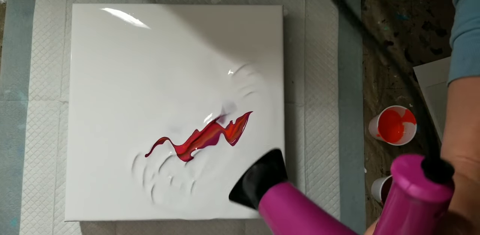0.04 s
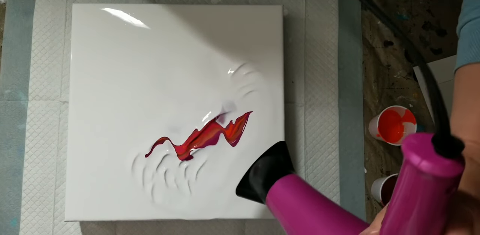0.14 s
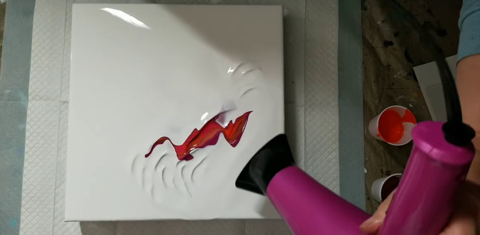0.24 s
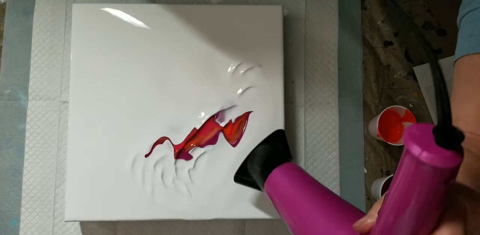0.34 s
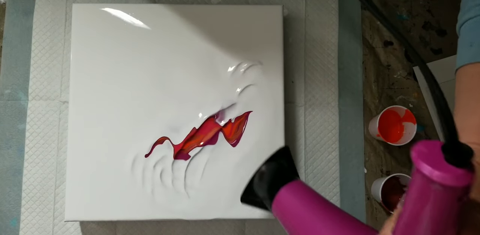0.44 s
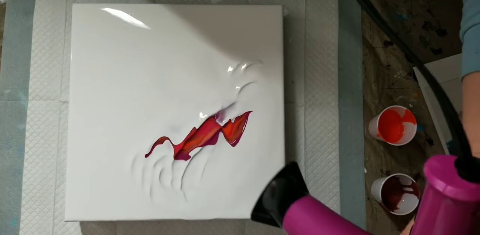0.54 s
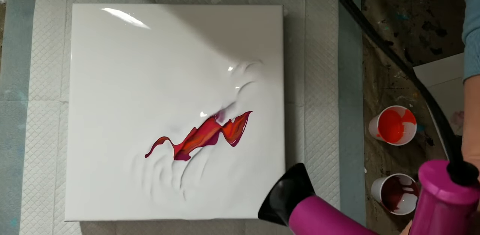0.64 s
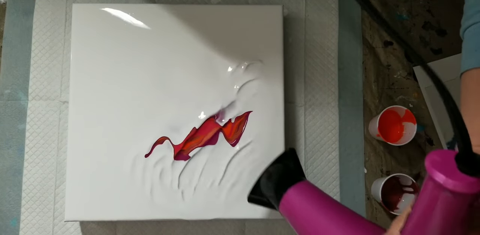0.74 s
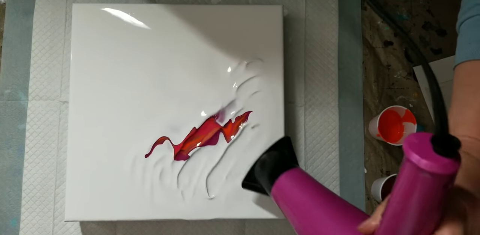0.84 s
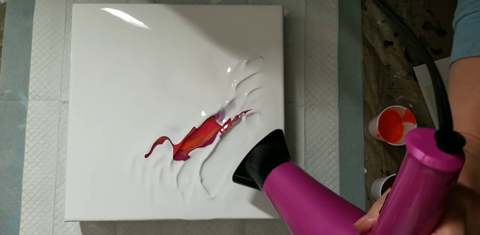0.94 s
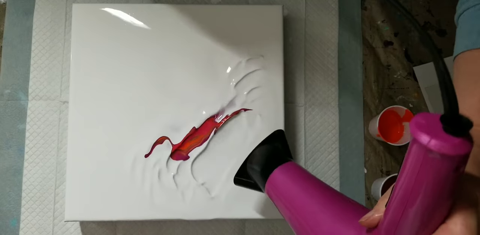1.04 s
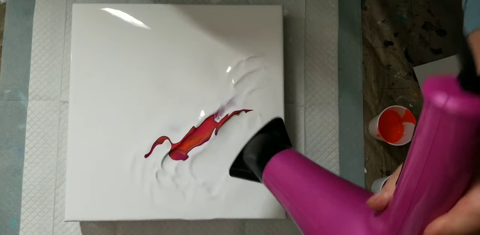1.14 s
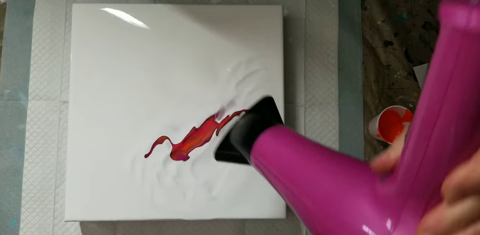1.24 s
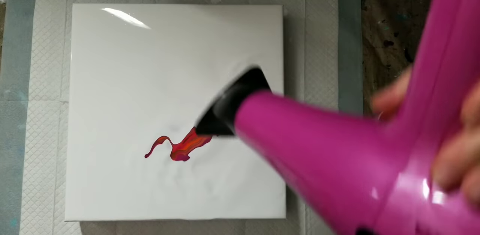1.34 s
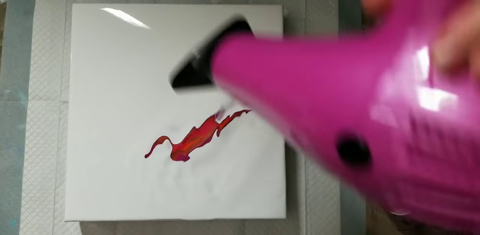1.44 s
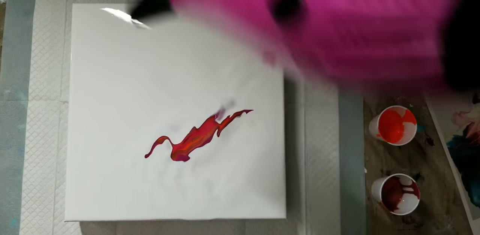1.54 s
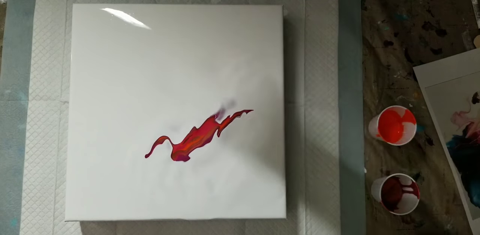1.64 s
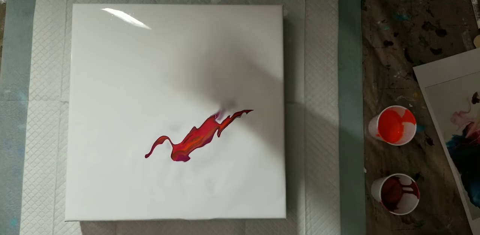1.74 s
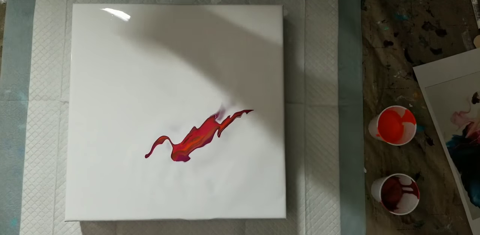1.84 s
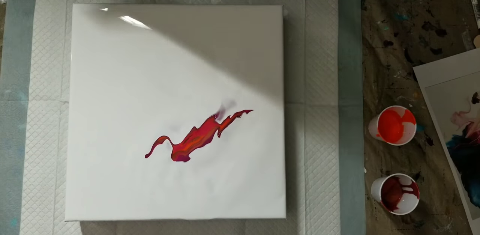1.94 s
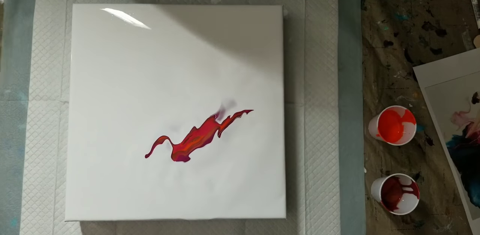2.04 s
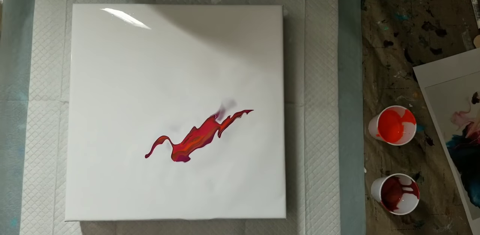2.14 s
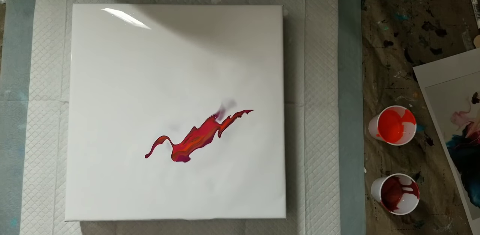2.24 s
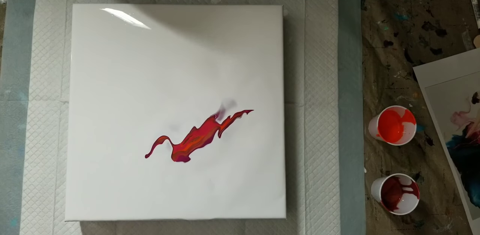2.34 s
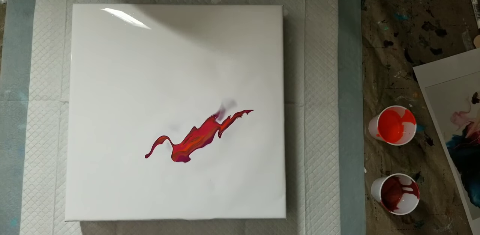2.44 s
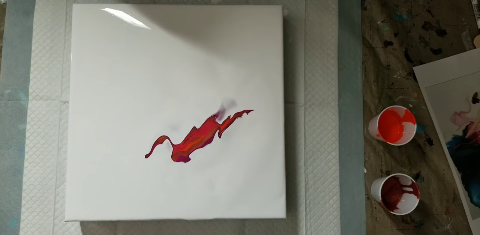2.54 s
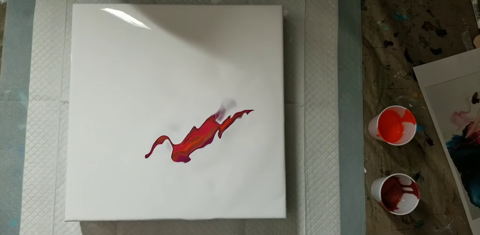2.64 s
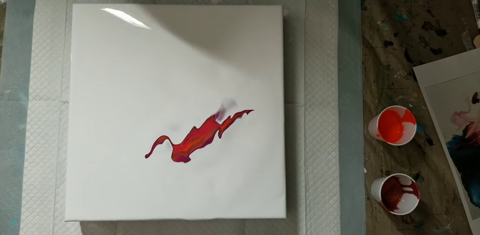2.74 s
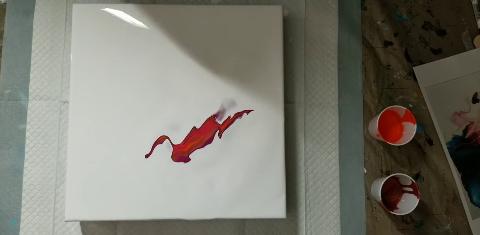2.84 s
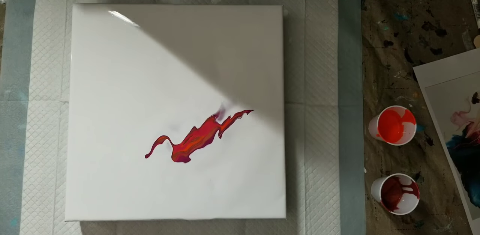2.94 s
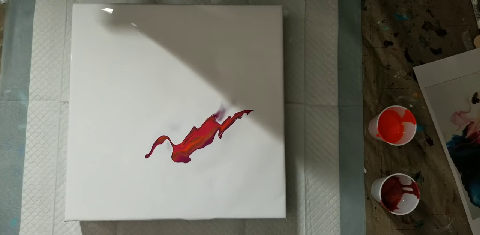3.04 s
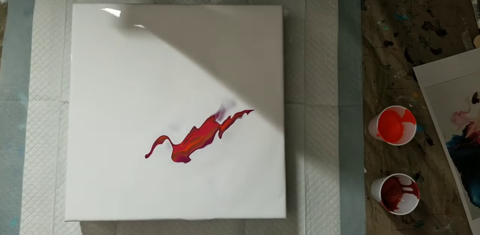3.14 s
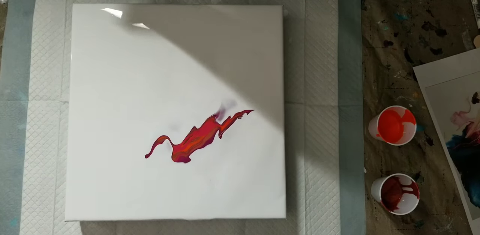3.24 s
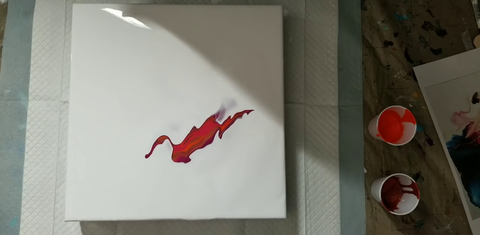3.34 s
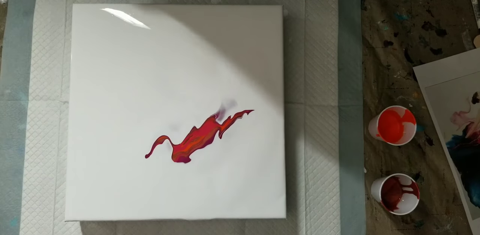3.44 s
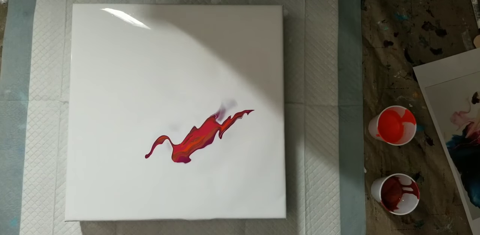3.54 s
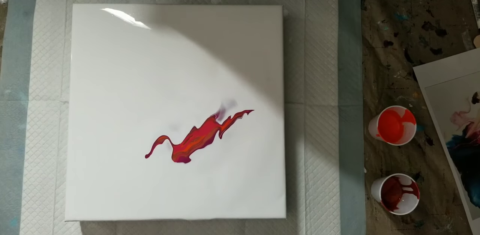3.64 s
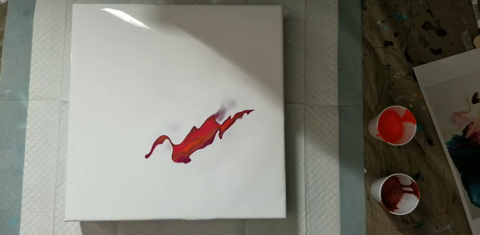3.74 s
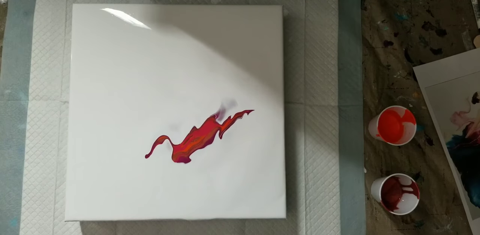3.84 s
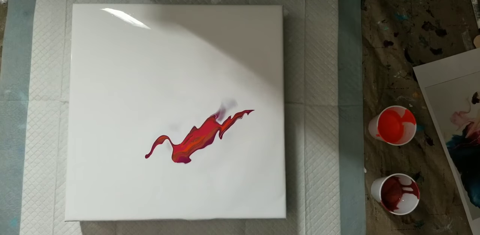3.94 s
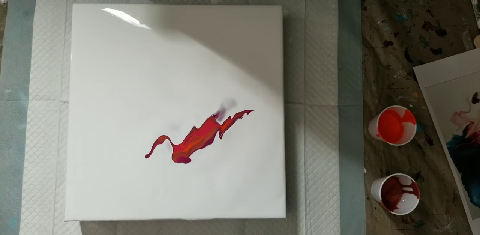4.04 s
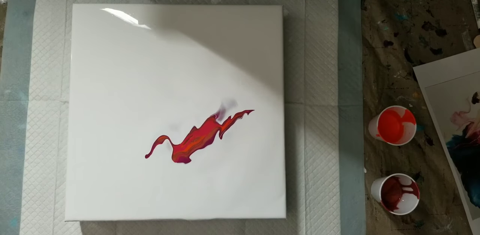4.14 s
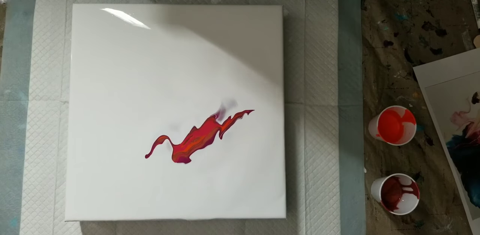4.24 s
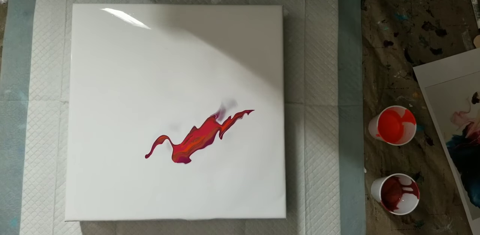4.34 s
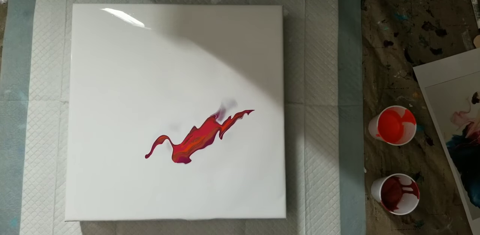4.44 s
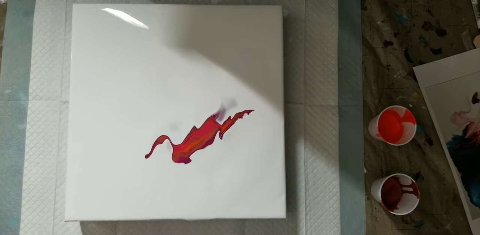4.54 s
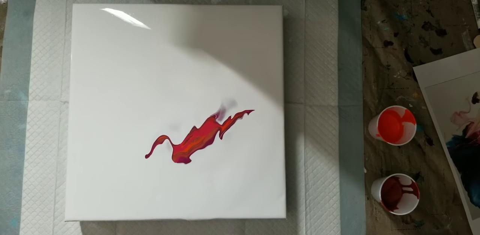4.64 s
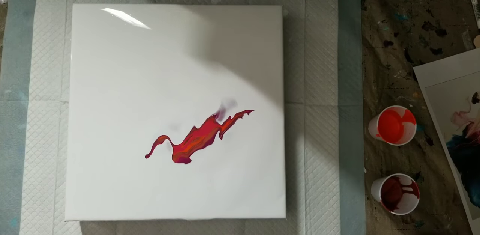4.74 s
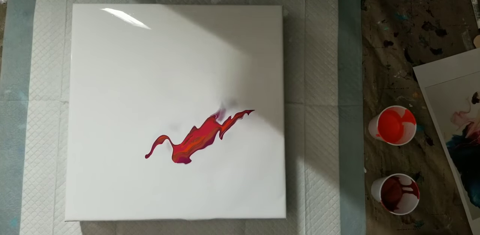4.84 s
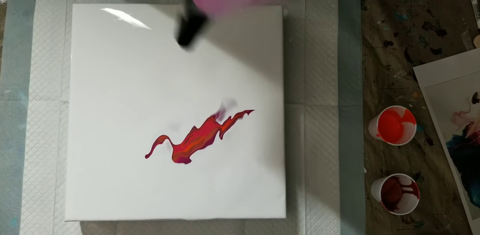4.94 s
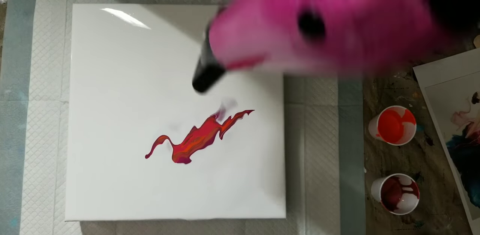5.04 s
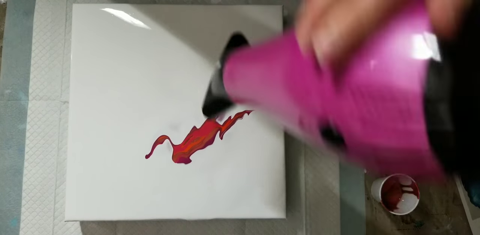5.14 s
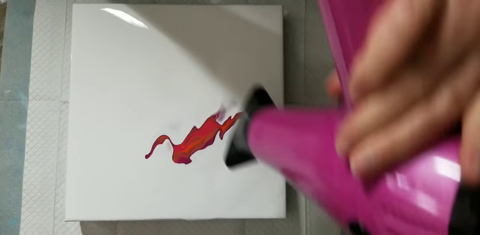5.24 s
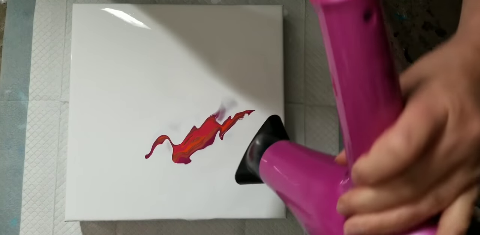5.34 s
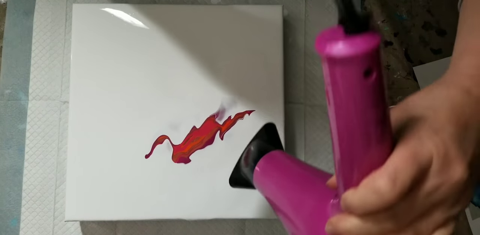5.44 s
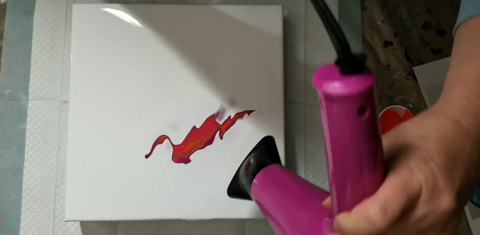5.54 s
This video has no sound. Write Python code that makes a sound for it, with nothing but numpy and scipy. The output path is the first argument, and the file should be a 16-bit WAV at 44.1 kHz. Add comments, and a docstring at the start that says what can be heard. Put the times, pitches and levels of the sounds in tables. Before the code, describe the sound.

A handheld hair dryer runs on high throughout, its broad airy roar and hiss topped by a fan whine near 2 kHz. It blows on a wet canvas, surges past the overhead stereo microphones, dips when held aside with the whine wavering, then builds and returns to the canvas. Small room, close pickup.

```python
"""Hair dryer over a canvas

A hair dryer on high blows at a canvas, swings up past overhead microphones, is held aside and comes back.
Shaped noise makes the roaring stream, the housing, the grille's hiss and the rush on the canvas.
Resonances ring on top in the housing, air intake and nozzle; a seven-blade fan whines in harmonics of its shaft.
Stray gusts buffet the microphones while the dryer is lifted; a small room and a table throw the air noise back."""
import sys
import numpy as np
from scipy import signal
from scipy.fft import rfft, irfft, next_fast_len
from scipy.io import wavfile
from scipy.ndimage import uniform_filter1d, map_coordinates

SR = 44100
rng = np.random.default_rng(int(sys.argv[2]) if len(sys.argv) > 2 else 0)


def transcribe(signal):
    """Save signal, clipped to [-1, 1], as a 16-bit WAV file at the path in sys.argv[1]."""
    frames = np.atleast_2d(signal).T
    limited = np.clip(frames, -1, 1)
    pcm = np.round(limited * 32767).astype(np.int16)
    wavfile.write(sys.argv[1], SR, pcm)


N = 247401  # length in samples

# where the dryer is: [t/s, lead of the left microphone/ms, left-right/dB, delay of the table's echo/ms]
DRYER_PATH = [(0, -0.11, 0.5, 1.44), (1.15, -0.14, 1, 1.26), (1.42, -0.14, -2.5, 2.33),
              (1.7, 0.16, 4, 3.38), (2.2, 0.27, 3, 2.72), (4.0, 0.16, 2.5, 3.1), (4.7, 0.12, 2.5, 3.07),
              (5.0, -0.027, 1, 3.56), (5.3, -0.16, -0.5, 2), (5.6, -.11, 1, 1.66)]
# how squarely the jet meets the canvas: [t/s, aim/0-1]
CANVAS_AIM = [(0, 0.93), (.5, 0.99), (1.1, 0.76), (1.35, 0.8), (1.6, 0), (1.9, 0.08), (5.1, 0.06),
              (5.35, 0.4), (5.61, 0.3)]
# loudness as the dryer nears and leaves the microphones: [t/s, level/dB]
NEARNESS = [(0, -23.5), (.35, -23), (.6, -23.5), (.9, -22.5), (1.2, -23), (1.38, -22), (1.52, -18.5),
            (1.66, -19.5), (1.85, -24.5), (2.05, -26.5), (2.45, -27), (2.9, -26.5), (3.25, -24),
            (3.75, -24), (4.3, -23), (4.75, -22.5), (4.95, -21), (5.3, -22), (5.61, -24.5)]
WORKING_DB = -22  # its value at working distance

# noise colour of the air stream: [f/Hz, relative level/dB]
STREAM_COLOUR = [(100, -60), (170, -20), (247, -10), (405, -10), (465, -2.5), (502, -3.5), (534, -3.5),
                 (646, -0.5), (755, 0.5), (988, -0.5), (1110, 2), (1260, -9.5), (1350, -3.5), (1760, -82),
                 (2970, -120)]
# noise colour of the housing: [f/Hz, relative level/dB]
HOUSING_COLOUR = [(740, -50), (1250, -3), (1330, -10), (1400, 3), (1470, -1.5), (1560, 1), (1770, 1),
                  (1940, 3), (1960, 2.5), (2100, -1), (2220, -2), (2330, 1), (2560, 0.5), (3100, -15.5),
                  (4030, -72), (6820, -120)]
# noise colour of the grille's hiss: [f/Hz, relative level/dB]
GRILLE_COLOUR = [(1650, -60), (2800, -3.5), (3120, -3.5), (3760, -1), (3920, 0), (4180, -5), (4300, -0.5),
                 (4560, -3.5), (4960, -7), (6330, -4), (6700, -4.5), (8000, -8.5), (8900, -17),
                 (11700, -14.5), (19800, -120)]
# noise colour of the topmost hiss: [f/Hz, relative level/dB]
SIZZLE_COLOUR = [(6000, -37), (8600, -10), (10500, -3.5), (12900, 7), (14400, 3)]
# noise colour of the jet splashing on the canvas: [f/Hz, relative level/dB]
CANVAS_COLOUR = [(110, -58), (160, -20.5), (210, -13.5), (250, -13.5), (310, -7.5), (400, -13.5),
                 (500, -1.5), (680, -3), (850, 2), (1060, -2.5), (1350, 4.5), (1800, -5), (2200, -7),
                 (3300, -33), (3850, -7.5), (4400, -10), (9000, -22)]
# noise colour of the gusts: [f/Hz, relative level/dB]
GUST_COLOUR = [(15, -34), (30, -21), (50, -10), (80, -3), (130, 2), (200, -5), (400, -21), (900, -60)]
# share of the power that arrives straight from the dryer: [f/Hz, share/0-1]
DIRECT_SHARE = [(200, 0.6), (700, 0.68), (1600, 0.76), (2800, 0.54), (4200, 0.55), (6500, 0.07),
                (13000, 0.56)]
# tilt between the microphones, the left hearing more treble: [f/Hz, left-right/dB]
PORT_TILT = [(150, -2.5), (500, 0), (1500, -1), (4000, 0), (8000, 1), (12500, 3.5)]

# the grille's slots face the microphones: [t/s, length/s, level/dB]
WHISTLE_FLARES = [(0, .58, -41), (.96, .2, -41), (1.599, 0.24, -38.5)]
# narrow modes of the housing: [f/Hz, width/Hz, relative level/dB]
HOUSING_MODES = [(534.5, 40, -8), (674.6, 50, -5.5), (1003, 41, -2.5), (1134, 30, -6), (1530, 45, -0.5),
                 (1630, 39, 0), (1706, 39, -1), (1914, 50, -3), (2370, 55, -13)]
# resonances of the air intake: [f/Hz, width/Hz, relative level/dB]
INTAKE_MODES = [(2416, 93, 2), (2623, 77, 2)]
# the intake faces the microphones: [t/s, length/s, level/dB]
INTAKE_FLARES = [(1.09, 0.17, -34), (1.38, 0.46, -30.5), (2.14, .12, -39), (2.87, 0.087, -43),
                 (4.54, 0.62, -30)]
# resonances that slide as the nozzle swings: [t/s, length/s, first f/Hz, last f/Hz, level/dB]
SWISHES = [(1.162, 0.36, 2110, 1950, -30.5), (1.38, 0.243, 1810, 1725, -27.5),
           (1.56, 0.33, 1640, 1452, -40), (4.953, 0.45, 1497, 1703, -32.5), (5.22, 0.27, 1785, 2045, -35)]

# speed of the fan: [t/s, shaft turns a second/Hz]
SHAFT_SPEED = [(0, 289.7), (.9, 290.2), (1.4, 290.3), (1.75, 289.5), (2.7, 289.9), (3.2, 289.9),
               (3.8, 289.5), (4.9, 289.9), (5.61, 289.4)]
# weaker shaft tones: [multiple of the shaft rate, relative level/dB]
SHAFT_TONES = [(1, -32), (3, -19.5), (4, -19.5), (6, -15.5)]
# the blade tone swells as the dryer crosses a standing wave of the room: [t/s, length/s, level/dB, left-right/dB]
WHINE_SWELLS = [(1.187, 0.24, -30, -5), (1.38, 0.36, -29, 4), (1.74, 0.3, -36, 7), (1.97, 0.1, -28, -10),
                (2.092, 0.2, -32.5, 22), (2.29, 0.53, -36, 18), (2.957, 0.14, -28, 13),
                (3.06, 0.47, -29.5, -23), (3.75, 0.35, -38.5, 8), (4.098, 0.44, -31, 14),
                (4.54, 0.32, -34.5, 3), (4.901, 0.18, -27.5, 5), (5.077, 0.15, -32, -3),
                (5.33, 0.38, -31.5, -5)]
# the blade tone's octave, which beams and fades as the dryer turns: [t/s, level/dB]
OCTAVE_LEVEL = [(0, -40), (.42, -35.5), (.7, -39.5), (1.03, -36.5), (1.6, -40.5), (2.1, -47), (2.4, -41),
                (3.4, -41), (4.1, -41.5), (5.0, -38.5), (5.2, -40), (5.38, -32), (5.6, -47)]
# the blade tone's third harmonic beams past the microphones: [t/s, length/s, level/dB]
THIRD_BEAMS = [(.65, .5, -46), (3.0, 0.72, -50), (4.303, .42, -39), (4.9, 0.28, -46)]
# the nozzle's drifting resonance: [t/s, f/Hz]
NOZZLE_PITCH = [(0, 1408), (1.3, 1410), (1.7, 1463), (2.2, 1418), (3.2, 1466), (4.9, 1456), (5.1, 1418),
                (5.61, 1412)]
# its hollow note blooms as the nozzle turns towards the microphones: [t/s, length/s, level/dB]
HOOT_BLOOMS = [(1.214, 0.23, -30), (1.498, 0.41, -33.5), (2.16, 0.12, -34), (3.1, 0.55, -40),
               (3.85, 1.4, -32.5), (4.917, 0.41, -25.5), (5.45, .2, -35)]
# puffs of air on the microphones: [t/s, length/s, level before the left-right trim/dB]
GUST_PUFFS = [(1.364, 0.1, -46.5), (1.47, 0.12, -44.5), (1.59, 0.16, -46), (1.77, 0.17, -52),
              (2.21, 0.18, -56), (2.399, 0.13, -56), (2.54, 0.069, -59), (2.665, 0.093, -57),
              (2.785, 0.1, -51), (3.043, 0.087, -51), (3.293, 0.051, -55), (3.504, 0.047, -53),
              (3.593, 0.079, -51), (3.81, 0.057, -50), (3.913, 0.05, -56), (4.032, 0.29, -54),
              (4.367, 0.12, -57), (4.522, 0.22, -54), (4.726, 0.17, -49.5), (4.92, 0.27, -50.5),
              (5.17, 0.19, -48), (5.541, 0.033, -53)]

BLADES = 7
SHAFT_JITTER_HZ = 0.35  # unsteadiness of the shaft
MODE_FADE_DB = 4  # how far the ringing modes come and go
SWELL_EDGE_S = 0.11
PORT_SPACING_MS = 0.36  # sound's travel time between the microphones
TOP_HZ = 14600


def airflow():
    """All the broad air noise: the moving parts are panned with the dryer, the rush on the canvas stays put."""
    pan_db = curves(DRYER_PATH)[1]
    return (stream() + housing() + grille() + sizzle() + whistle()) * panned(pan_db) + canvas()


def stream_level():
    """Level in dB of the jet, shared by the free stream and the rush on the canvas."""
    return heard_db(db=-27.5, growth=0.93, aimed_db=1.66)


def stream():
    """The part of the jet that misses the canvas roars as turbulent noise."""
    level_db = stream_level()
    free = np.sqrt(1 - aim_curve() ** 2)
    roar = amp(level_db) * free * turbulence(STREAM_COLOUR, *moving_path(), echo=0.35, room_db=0.5)
    # where the stream is softer it loses body below about 560 Hz
    closeness = amp(0.16 * (level_db - level_db.max()))
    body = filtered(roar, lambda hz: 1 / (1 + (hz / 560) ** 8))
    return roar + 0.96 * (closeness - 1) * body


def canvas(sway_db=0.0):
    """The jet splashes on the canvas as patchy noise from a fixed place, stronger the squarer the aim."""
    splash = turbulence(CANVAS_COLOUR, lead_ms=0.013, echo_ms=0.52, echo=0.052, room_db=-1.0)
    level_db = stream_level() + 4.0 + sway_db * wobble(5.4)
    return amp(level_db) * aim_curve() * eddies(splash, depth_db=1.6)


def housing():
    """Air noise coloured by the broad resonances of the housing."""
    level_db = heard_db(db=-23.5, growth=0.85, aimed_db=-6.0)
    return amp(level_db) * turbulence(HOUSING_COLOUR, *moving_path(), echo=0.032, room_db=0.5)


def grille():
    """Air hisses through the grille, with eddies shifting its spectrum."""
    level_db = heard_db(db=-25.5, growth=0.94, aimed_db=-1.0)
    hiss = turbulence(GRILLE_COLOUR, *moving_path(), echo=0.27, room_db=5.5)
    return amp(level_db) * eddies(hiss, depth_db=0.8)


def sizzle(flutter_db=0.6):
    """The topmost hiss arrives from all walls and flutters lightly."""
    level_db = heard_db(db=-31.5, growth=0.76, aimed_db=-2.5) + flutter_db * wobble(25)
    return amp(level_db) * unit(room_noise(lambda hz: amp(along(SIZZLE_COLOUR, hz))))


def whistle():
    """Two breathy resonances of the grille; the lower one flares when its slots face the microphones."""
    lead_ms, pan_db, _ = curves(DRYER_PATH)
    low_gain = np.hypot(amp(heard_db(db=-45.0, growth=0.41, aimed_db=-3)), swells(WHISTLE_FLARES))
    high_gain = amp(heard_db(db=-43.5, growth=0.8, aimed_db=-15))
    low = low_gain * resonance(hz=3830, width_hz=54, lead_ms=lead_ms)
    high = high_gain * resonance(hz=6410, width_hz=110, lead_ms=lead_ms)
    # panned here and again with the rest of the airflow, so it leans further to its side
    return panned(pan_db) * (low + high)


def housing_modes(stray_hz=12):
    """Air noise rings in narrow modes of the housing; each comes and goes, and strays, as the dryer turns."""
    lead_ms, pan_db, _ = curves(DRYER_PATH)
    arrival = np.arange(N) / SR + np.array([lead_ms, -lead_ms]) / 2 / 1000
    out = np.zeros((2, N))
    for hz, width_hz, db in HOUSING_MODES:
        ring = swirl(width_hz) * amp(MODE_FADE_DB * wobble(5))
        drift = np.cumsum(stray_hz * wobble(4)) / SR
        out += amp(db) * unit(np.real(ring * np.exp(2j * np.pi * (hz * arrival + drift))))
    return amp(heard_db(db=-36.0, growth=1.07, aimed_db=0.5)) * panned(pan_db) * out


def intake():
    """The air intake flutters in two close resonances, which stand out when it faces the microphones."""
    lead_ms, pan_db, _ = curves(DRYER_PATH)
    rings = np.zeros((2, N))
    for hz, width_hz, db in INTAKE_MODES:
        rings += amp(db + MODE_FADE_DB * wobble(9)) * resonance(hz, width_hz, lead_ms)
    gain = np.hypot(amp(heard_db(db=-38.5, growth=0.27, aimed_db=3.5)), swells(INTAKE_FLARES))
    return gain * panned(pan_db) * unit(rings)


def swish(rate=120):
    """As the nozzle swings up, a narrow resonance in its air noise slides down; on the return it rises."""
    out = np.zeros((2, N))
    for start, length, first_hz, last_hz, db in SWISHES:
        progress = np.clip((np.arange(N) / SR - start) / length, 0, 1)
        centre_hz = first_hz * (last_hz / first_hz) ** progress
        # one part is shared by both microphones, one belongs to each
        breath = np.array([swirl(rate) for _ in range(3)])
        carrier = np.exp(2j * np.pi * np.cumsum(centre_hz) / SR)
        band = np.real((breath[0] + 0.5 * breath[1:]) * carrier)
        out += amp(db) * np.sin(np.pi * progress) * unit(band)
    return out


def fan():
    """One unsteady shaft drives the blade tone, its harmonics, weaker shaft tones and the nozzle's hollow note."""
    turns = np.cumsum(curves(SHAFT_SPEED)[0] + SHAFT_JITTER_HZ * wobble(14)) / SR
    lead_ms, pan_db, _ = curves(DRYER_PATH)
    # on the canvas the tones reach both microphones nearly together
    lead_ms = lead_ms * (1 - curves(CANVAS_AIM)[0])
    heard = turns + np.array([lead_ms, -lead_ms]) / 2 * SHAFT_SPEED[0][1] / 1000
    own_mix = blade_octave(heard) + blade_whine(heard, pan_db) + nozzle_hoot(heard, pan_db)
    return own_mix + panned(pan_db) * (shaft_tones(heard) + blade_third(heard))


def blade_whine(heard, pan_db):
    """Seven blades passing at each turn sound one tone, which swells in the room's standing waves."""
    steady_db = heard_db(db=-36.5, growth=1.0, aimed_db=3.0)
    return swelling(steady_db, WHINE_SWELLS, pan_db) * tone(heard, BLADES, scatter=0.2, rate=35)


def blade_octave(heard, fade_db=1.2):
    """The blade tone's octave, part of it smeared into a narrow noise band by turbulence at the blades."""
    clear = tone(heard, 2 * BLADES, scatter=0.41, rate=46)
    smeared = tone(heard, 2 * BLADES, scatter=1.7, rate=220)
    return amp(curves(OCTAVE_LEVEL)[0] + fade_db * wobble(9.0)) * (0.76 * clear + 0.72 * smeared)


def blade_third(heard):
    """The blade tone's third harmonic, faint except where it beams past the microphones."""
    return (amp(-49) + swells(THIRD_BEAMS)) * tone(heard, 3 * BLADES, scatter=0.4, rate=30)


def shaft_tones(heard, fade_db=0.5):
    """Weak multiples of the shaft rate that come and go."""
    tones = np.zeros((2, N))
    for order, db in SHAFT_TONES:
        tones += amp(db) * unit(amp(fade_db * wobble(3.17)) * tone(heard, order, scatter=1.14, rate=16))
    return amp(heard_db(db=-26.5, growth=0.53, aimed_db=3.5)) * tones


def nozzle_hoot(heard, pan_db, width_hz=40, side_db=5):
    """The nozzle rings with the air noise and with the fifth shaft tone, which lies in its resonance."""
    cycles = np.cumsum(curves(NOZZLE_PITCH)[0]) / SR
    ring = np.real(swirl(width_hz) * np.exp(2j * np.pi * cycles))
    note = 0.64 * unit(ring) + 0.64 * tone(heard, order=5, scatter=0.78, rate=30)
    blooms = [(*row, side_db) for row in HOOT_BLOOMS]
    return swelling(heard_db(db=-37.0, growth=0.53, aimed_db=1.0), blooms, pan_db) * note


def gusts(flutter_db=3.5, draught_db=-79, edge_share=0.5):
    """Stray puffs, each a rounded swell of low noise over a faint draught, beat harder on the right microphone."""
    shared = 1.1 * rng.standard_normal(N)
    puffs = filtered(shared + rng.standard_normal((2, N)), lambda hz: amp(along(GUST_COLOUR, hz)))
    strength = amp(draught_db) + sum(amp(db) * swell(s, length, edge_share * length)
                                     for s, length, db in GUST_PUFFS)
    return strength * amp(flutter_db * wobble(22)) * unit(puffs) * amp([[-3], [1.5]])


def turbulence(spectrum, lead_ms, echo_ms, echo, room_db):
    """Air noise from one place: the straight path, its echo off the table, and the room."""
    share = lambda hz: along(DIRECT_SHARE, hz)
    colour = lambda hz: amp(along(spectrum, hz))
    straight = filtered(rng.standard_normal(N), lambda hz: colour(hz) * np.sqrt(share(hz)))
    straight = straight + echo * delayed(straight, echo_ms)
    room = room_noise(lambda hz: colour(hz) * np.sqrt(1 - share(hz)))
    return unit(at_microphones(straight, lead_ms) + amp(room_db) * room)


def room_noise(colour, common=0.75):
    """Noise from all walls: most alike at both microphones in the bass, its shifting dips shallower in the treble."""
    hz, _, z = signal.stft(rng.standard_normal((2, N)), SR, nperseg=2048)
    field = uniform_filter1d(rng.standard_normal(z.shape), size=2, axis=1)
    field = uniform_filter1d(field, size=28, axis=2)
    depth_db = 4.5 / (1 + hz[:, None] / 4000)
    pair = unit(signal.istft(z * amp(depth_db * unit(field)))[1][:, :N])
    alike = lambda f: common * np.sinc(2 * f * PORT_SPACING_MS / 1000)
    mid_side = lambda f: np.sqrt(np.array([1 + alike(f), 1 - alike(f)]) / 2)
    mid, side = filtered(pair, lambda f: colour(f) * mid_side(f))
    return np.array([mid + side, mid - side])


def eddies(x, depth_db):
    """Eddies in the air lift and drop broad patches of the spectrum for a few hundredths of a second."""
    z = signal.stft(x, nperseg=512)[2]
    field = uniform_filter1d(rng.standard_normal(z.shape[1:]), size=6, axis=0)
    field = uniform_filter1d(field, size=9, axis=1)
    return unit(signal.istft(z * amp(depth_db * unit(field)))[1][:, :N])


def resonance(hz, width_hz, lead_ms):
    """Air noise ringing in one narrow resonance, at the two microphones."""
    ring = filtered(rng.standard_normal(N), lambda f: 1 / (1 + (2 * (f - hz) / width_hz) ** 2))
    return unit(at_microphones(ring, lead_ms))


def tone(heard, order, scatter, rate):
    """One harmonic of the shaft at rms 1, fading as scattered reflections shift."""
    walls = np.array([swirl(rate) for _ in range(2)])
    return unit(np.real((1 + scatter * walls) * np.exp(2j * np.pi * order * heard)))


def swelling(steady_db, rows, pan_db):
    """Left and right gain of a steady tone with swells added in power."""
    power = (amp(steady_db) * panned(pan_db)) ** 2
    for start, length, db, side_db in rows:
        power = power + (amp(db) * panned(side_db)[:, None] * swell(start, length, SWELL_EDGE_S)) ** 2
    return np.sqrt(power)


def swells(rows):
    """Summed gain of several swells."""
    return sum(amp(db) * swell(start, length, SWELL_EDGE_S) for start, length, db in rows)


def swell(start, length, edge):
    """Rise, hold and fall between 0 and 1; the rounded edges are centred on the start and the end."""
    t = np.arange(N) / SR - start
    return np.sin(np.pi / 2 * np.clip(0.5 + np.minimum(t, length - t) / edge, 0, 1)) ** 2


def heard_db(db, growth, aimed_db):
    """Level of one part: db at working distance, growing with nearness, changed by aiming at the canvas."""
    return db + growth * (curves(NEARNESS)[0] - WORKING_DB) + aimed_db * curves(CANVAS_AIM)[0]


def aim_curve():
    """How squarely the jet meets the canvas, 0 to 1."""
    return np.clip(curves(CANVAS_AIM)[0], 0, 1)


def moving_path():
    """Lead of the left microphone and delay of the table's echo, both in ms."""
    lead_ms, _, echo_ms = curves(DRYER_PATH)
    return lead_ms, echo_ms


def at_microphones(x, lead_ms):
    """The same sound at both microphones, reaching the left one earlier by the lead."""
    return np.array([delayed(x, -lead_ms / 2), delayed(x, lead_ms / 2)])


def delayed(x, ms):
    """x arriving later by a changing delay."""
    return map_coordinates(x, [np.arange(N) - ms * SR / 1000], mode="mirror")


def panned(db):
    """Left and right gains for a level difference, at constant power."""
    gains = amp(np.array([db, -db]) / 2)
    return gains / np.sqrt(np.mean(gains ** 2, axis=0))


def filtered(x, response):
    """x times a response of frequency."""
    m = next_fast_len(N + SR // 4)
    return irfft(rfft(x, m) * response(np.fft.rfftfreq(m, 1 / SR)), m)[..., :N]


def wobble(rate):
    """A smooth random curve, rate knots a second."""
    knots = np.arange(N) * rate / SR
    coarse = knots[::32]
    curve = map_coordinates(rng.standard_normal(int(knots[-1]) + 4), [coarse])
    return np.interp(knots, coarse, curve)


def swirl(rate):
    """A wobble of both strength and phase, as a complex curve."""
    return wobble(rate) + 1j * wobble(rate)


def curves(rows):
    """One value per sample for each column after the time."""
    s, *cols = np.transpose(rows)
    return [np.interp(np.arange(N) / SR, s, c) for c in cols]


def along(points, hz):
    """Interpolate (f/Hz, value) points on a log axis."""
    f, v = np.transpose(points)
    return np.interp(np.log(hz + 1), np.log(f + 1), v)


def amp(db):
    """Decibels to gain."""
    return 10 ** (np.asarray(db) / 20)


def unit(x):
    """Scale to rms 1."""
    return x / np.sqrt(np.mean(x ** 2) + 1e-20)


def scene(low_hz=130):
    """The dryer's air and fan at the two microphones; the broad air noise leaves the deep bass to the gusts."""
    air = filtered(airflow(), lambda hz: panned(along(PORT_TILT, hz)) / (1 + (low_hz / (hz + 1)) ** 6))
    return air + housing_modes() + intake() + swish() + fan() + gusts()


def record(dry):
    """The microphones' channel keeps nothing above its band limit."""
    return filtered(dry, lambda hz: hz < TOP_HZ)


dry = scene()
out = record(dry)
transcribe(out)
```